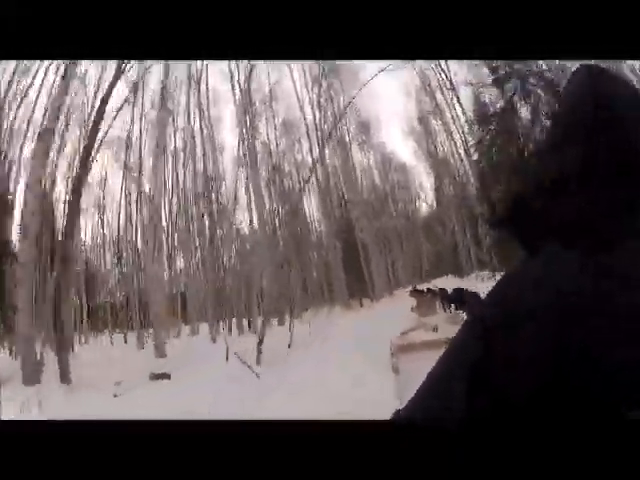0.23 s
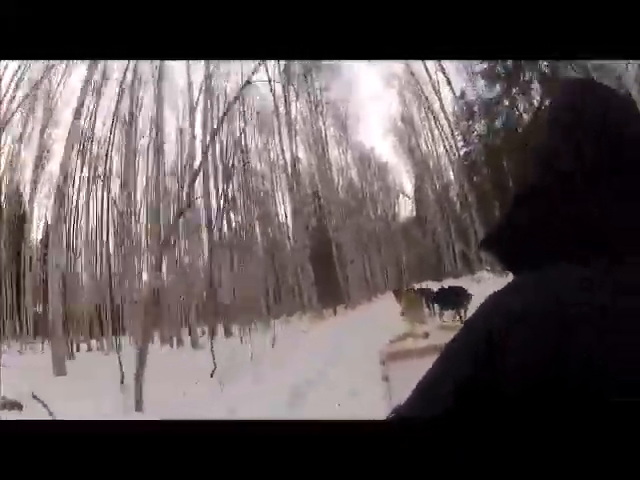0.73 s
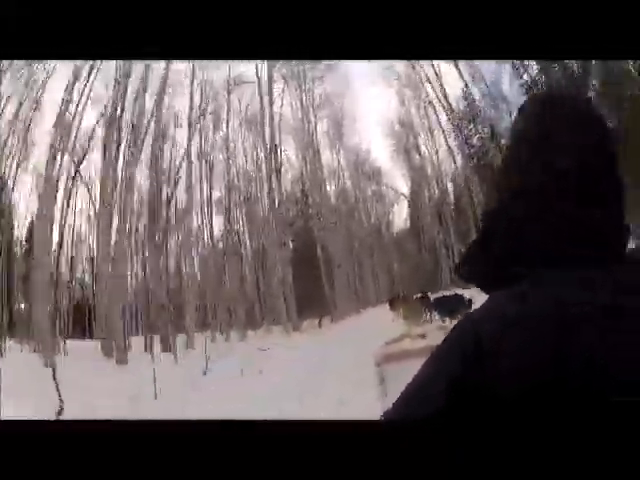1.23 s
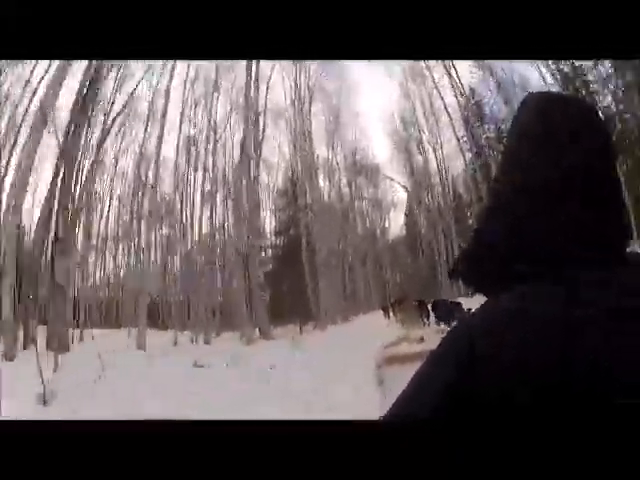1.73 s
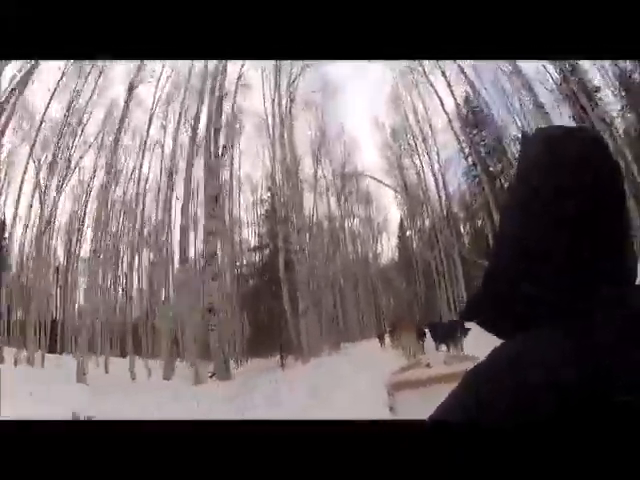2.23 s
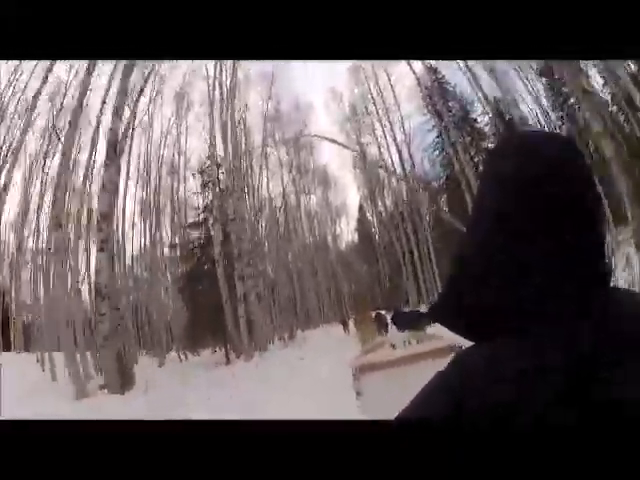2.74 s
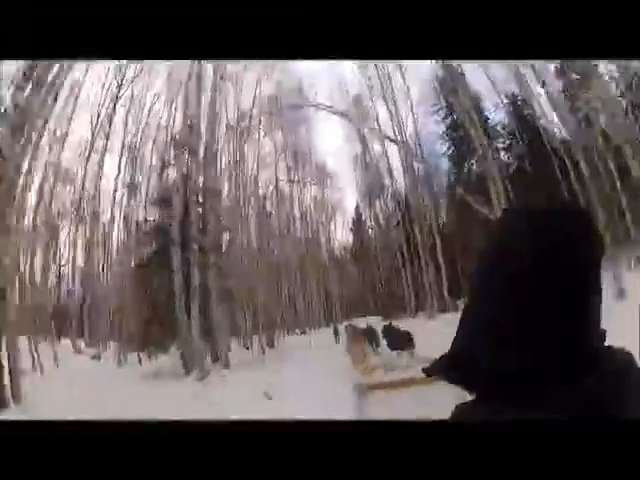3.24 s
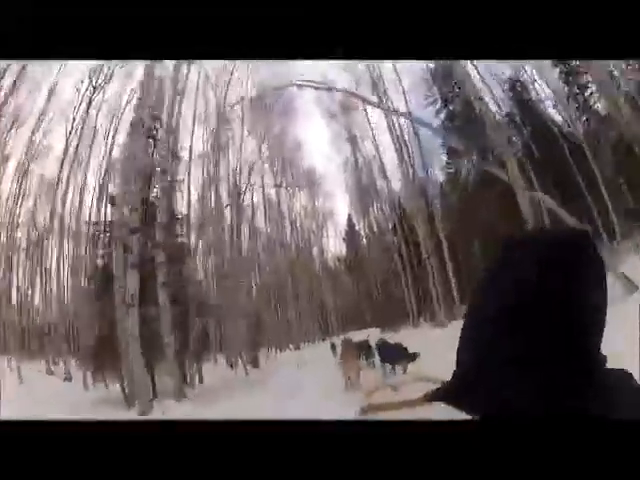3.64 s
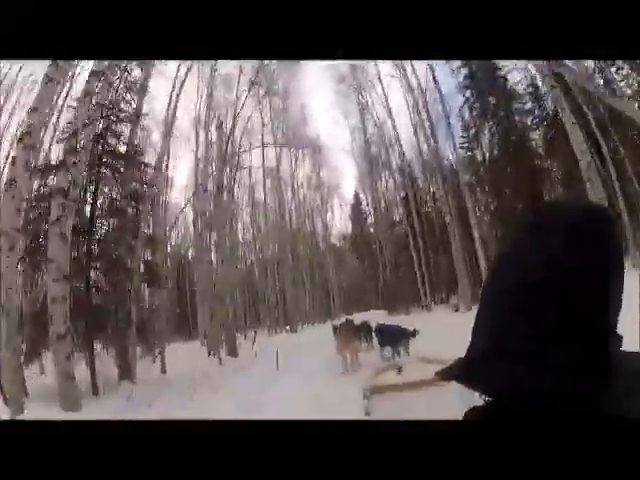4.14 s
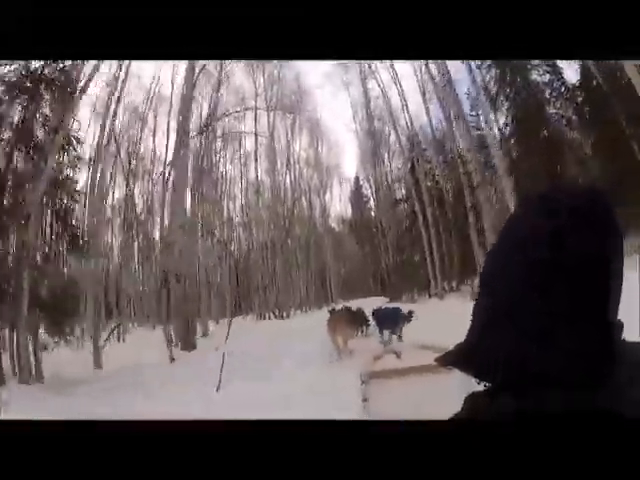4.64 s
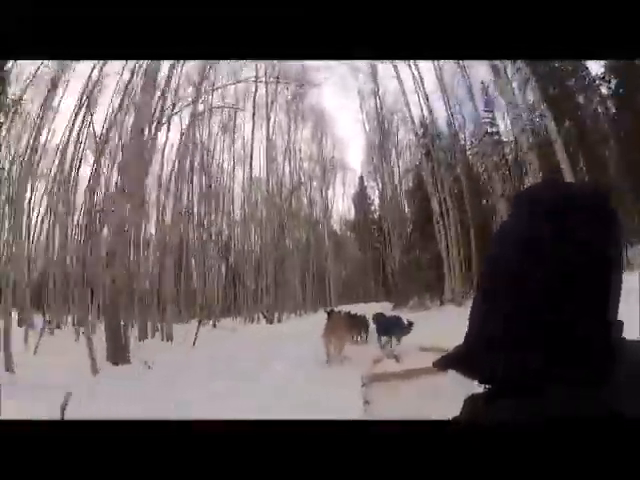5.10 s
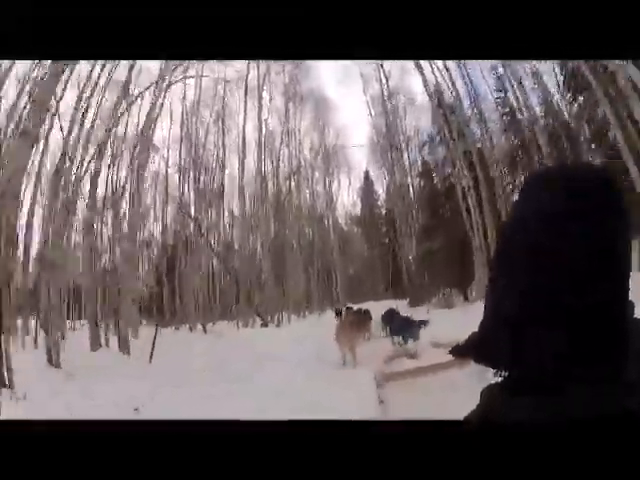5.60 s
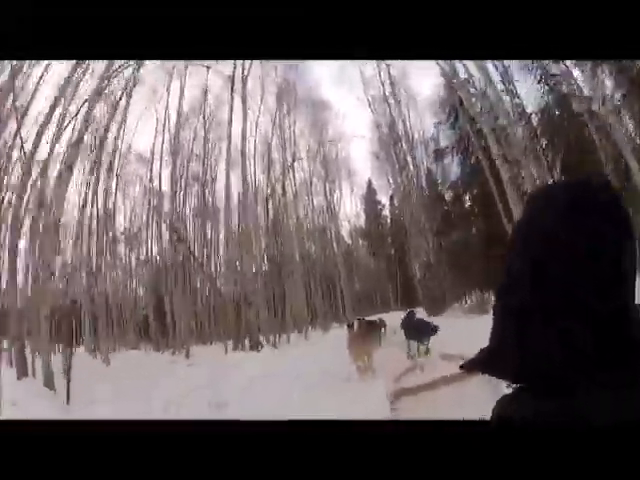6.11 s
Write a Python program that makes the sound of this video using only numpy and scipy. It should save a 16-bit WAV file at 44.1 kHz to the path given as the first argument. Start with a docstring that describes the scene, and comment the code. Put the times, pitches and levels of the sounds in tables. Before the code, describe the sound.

Muffled wooden sled runners chatter and rumble along a packed snow trail, with irregular knocks, faint snow hiss and a few hard, heavy slams.

```python
"""On a packed snow trail, a wooden sled slides along, heard through a sealed camera housing.
Runner chatter is random crust clicks ringing the frame modes; bumps add knocks, slams and thuds.
Noise bursts tick on the shell, coloured noise makes a faint snow hiss and a deep rumble.
The recorder samples slowly and holds each value, which mirrors the bass into the treble."""
import sys
import numpy as np
from scipy import signal
from scipy.fft import rfft, irfft, next_fast_len
from scipy.io import wavfile

SR = 44100
rng = np.random.default_rng(int(sys.argv[2]) if len(sys.argv) > 2 else 0)


def makeup_ratio(level_db):
    """Linear amplitude ratio for a level in decibels (20 dB per factor of ten)."""
    decades = np.asarray(level_db, float) / 20
    return 10 ** decades


def wav_out(sig):
    """Save sig, one row per channel (or a flat mono array), as 16-bit PCM at SR to the path in sys.argv[1]."""
    wavfile.write(sys.argv[1], SR, np.round(np.clip(np.atleast_2d(sig).T, -1, 1) * 32767).astype(np.int16))


N = 280476  # length in samples


def rms_one(x):
    """Scales x to an rms of 1."""
    return x / np.sqrt(np.mean(x ** 2) + 1e-20)


def in_time(rows):
    """Draws straight lines between timed rows, one curve per column after the time."""
    s, *columns = np.transpose(rows)
    return [np.interp(np.arange(N) / SR, s, c) for c in columns]


def drift(rate_hz):
    """Slow random wander of spread 1: noise through two equal poles at rate_hz."""
    step = 40  # samples between computed points
    r = np.exp(-2 * np.pi * rate_hz * step / SR)
    noise = rng.standard_normal(N // step + 2002)
    slow = signal.lfilter([1], [1, -2 * r, r * r], noise)[2000:]  # drop the filter's start
    return np.interp(np.arange(N) / step, np.arange(len(slow)), rms_one(slow))


def resonate(x, hz, width_hz):
    """Two-pole resonance; a unit click rings with a height of about 1."""
    r, w = np.exp(-np.pi * width_hz / SR), 2 * np.pi * hz / SR
    return signal.lfilter([0, np.sin(w)], [1, -2 * r * np.cos(w), r * r], x + 1e-18)


def low_pass(x, cut_hz, order):
    """Butterworth roll-off above cut_hz."""
    return signal.sosfilt(signal.butter(order, cut_hz, fs=SR, output="sos"), x)


def grains(per_s, spread_db):
    """Random clicks of uneven size and sign; rms 1."""
    size_db = spread_db * np.minimum(rng.exponential(1, N), 4)
    clicks = makeup_ratio(size_db) * rng.choice([-1, 1], N)
    return rms_one(clicks * (rng.random(N) < per_s / SR))


def coloured(x, spectrum):
    """Shapes x to a spectrum of (frequency [Hz], level [dB per Hz]); rms 1."""
    size = next_fast_len(N)
    hz, db = np.transpose(spectrum)
    f = np.maximum(np.fft.rfftfreq(size, 1 / SR), 1)
    gain = makeup_ratio(np.interp(np.log(f), np.log(hz), db, -90, -90))
    return rms_one(irfft(rfft(x, size) * gain, size)[:N])


def crust_bumps():
    """Dense small clicks of the crust under the runners, swelling and fading at random."""
    return grains(300, spread_db=0.5) * makeup_ratio(3.0 * drift(10.2))


# Resonant modes of the sled frame: (frequency [Hz], width [Hz], level [dB])
FRAME_MODES = [(55, 40, -8), (100, 60, -7), (134, 32, 0), (195, 50, -4), (240, 40, -3), (290, 28, 0),
               (350, 50, -8), (440, 70, -4), (520, 60, -2), (595, 50, 0)]
# Borders between the deep, middle and upper modes: (frequency [Hz])
MODE_BORDERS_HZ = [170, 380]


def frame_shake(levels_db, crust):
    """Crust bumps excite every frame mode; each mode also gets bumps of its own."""
    groups = np.zeros((3, N))  # deep, middle, upper
    lumps = grains(45, spread_db=2.0)  # sparse lumps of ice
    for k, (hz, width_hz, db) in enumerate(FRAME_MODES):
        own_bumps = grains(500, spread_db=2.0) * makeup_ratio(0.65 * drift(15.0))
        push = 0.5 * crust + 0.33 * lumps + own_bumps
        group = int(hz > MODE_BORDERS_HZ[0]) + int(hz > MODE_BORDERS_HZ[1])
        sign = (-1) ** k  # neighbouring modes move in opposite phase
        groups[group] += sign * makeup_ratio(db) * rms_one(resonate(push, hz, width_hz))
    return sum(makeup_ratio(db) * rms_one(x) for db, x in zip(levels_db, groups))


# Bumps that knock the frame: (time [s], strike level [dB], best-struck pitch [octaves above the
# lowest mode], spread around that pitch [octaves], slam level [dB])
BUMPS = [(0.393, -26, 2.4, 0.33, -24), (0.522, -43, 2.2, .7, -19.5), (0.862, -25, 2.1, 0.26, -22),
         (0.977, -11, 2.44, 0.52, -38), (0.992, -20.5, 2.2, 1.8, -40), (1.099, -20, 2.65, 0.77, -28),
         (1.15, -23.5, 1.6, 1.3, -47), (1.218, -27.5, 2.05, 1.34, -39), (1.473, -20.5, 2, 0.47, -43),
         (1.614, -27.5, 2.78, 0.49, -16.5), (1.846, -22.5, 1.64, 0.67, -29), (2.042, -31, 2.77, 0.88, -27),
         (2.278, -26.5, 2.83, 0.4, -30), (2.375, -19, 1.73, 0.39, -42), (2.39, -22, 2.14, 0.25, -35),
         (2.486, -26.5, 2.75, 0.7, -31), (2.53, -25.5, 2.85, 0.46, -29), (2.615, -34.5, 3.8, 0.65, -42),
         (2.729, -23.5, 2.5, 0.56, -24), (2.752, -20, 4, .8, -32), (2.764, -21.5, 1.95, 1.57, -36),
         (2.78, -21.5, 1.5, 0.38, -42), (2.79, -18, 2.77, 0.53, -38), (2.801, -24.5, 2.2, 0.77, -39),
         (3.380, -19, 1.49, 0.95, -9), (3.3958, -34, 1.14, 1.3, -15.5), (3.442, -26, 1.76, 0.49, -22),
         (3.849, -23, 2.64, 0.46, -18), (3.887, -18.5, 2.6, 0.58, -35), (3.902, -28, 2.1, 0.58, -26),
         (4.398, -29, 2.76, 0.68, -48), (4.707, -24.5, 2.24, 0.75, -25), (4.805, -35, 3.14, .6, -34),
         (5.205, -30.5, 2.1, .6, -25), (5.298, -32, 2.9, 0.62, -26), (5.682, -20.5, 1.2, 1.57, -30),
         (5.699, -28, .6, 1.9, -29), (6.097, -28, 2.6, 1.2, -34), (6.129, -26, 2.17, 0.83, -17),
         (6.1375, -23.5, 1.68, 1.06, -1.5), (6.156, -15.5, 1.28, 1.1, -19.5), (6.173, -35, 1.64, 0.83, -26),
         (6.208, -24, 1.65, 0.76, -38), (6.328, -25, 1.93, 0.77, -29)]
THUD_HZ, THUD_DB, THUD_DB_PER_OCTAVE = 42.4, -4.5, -5.5  # re slam; weaker under a higher pitch
SLAM_CYCLES = 0.78  # a slam's envelope peaks after this many cycles


def knocks():
    """Padded blows ring the modes near their pitch, the joints build it up; slams and thuds join in."""
    s, strike_db, octave, spread, slam_db = np.transpose(BUMPS)
    at, out = np.round(s * SR).astype(int), np.zeros(N + SR)
    lowest_hz = FRAME_MODES[0][0]
    for hz, width_hz, db in FRAME_MODES:
        distance = (np.log2(hz / lowest_hz) - octave) / spread
        blows = np.zeros(N)
        blows[at] = makeup_ratio(strike_db + db - 7.4 * distance ** 2)
        struck = resonate(blows, hz, 1.09 * width_hz)
        share = 0.39  # width of the joints' broad resonance, as a share of its pitch
        motion = np.diff(struck, prepend=0)  # the joints pass motion, not steady load
        out[:N] -= 2 * share * resonate(motion, hz, share * hz)

    # the whole sled thuds under a slam
    thuds = np.zeros(N)
    thuds[at] = makeup_ratio(slam_db + THUD_DB + THUD_DB_PER_OCTAVE * octave)
    out[:N] += low_pass(resonate(thuds, THUD_HZ, 30.0), 90, order=2)

    # the dead slam: a sine that dies within a few cycles
    t = np.arange(SR // 10) / SR
    for i, o, db in zip(at, octave, slam_db):
        cycles = t * lowest_hz * 2 ** o
        rise = cycles / SLAM_CYCLES
        envelope = (rise * np.exp(1 - rise)) ** 2
        out[i:i + len(t)] -= makeup_ratio(db) * np.sin(2 * np.pi * cycles) * envelope
    return out[:N]


# Brittle ticks and scuffs on the shell:
# (time [s], peak level of the ring [dB], pitch [Hz], width [Hz], burst length [s])
SHELL_TICKS = [(0.165, -35.5, 3220, 1100, 0.0046), (0.343, -43, 2300, 800, 0.04),
               (0.972, -33.5, 2610, 250, 0.018), (0.977, -40, 3590, 900, 0.0072),
               (1.100, -37, 2340, 790, 0.011), (1.101, -41, 1180, 298, 0.021), (1.61, -41, 2370, 600, 0.01),
               (2.052, -39.5, 2730, 80.4, 0.01), (2.055, -47, 1980, 120, 0.012),
               (3.028, -41, 1070, 300, 0.0094), (3.369, -39.5, 2460, 790, 0.027),
               (3.944, -49, 1270, 300, 0.05), (5.958, -32.5, 2880, 1200, 0.0069),
               (6.126, -41, 2480, 600, 0.012)]
# the broader and shorter a tick, the more crack leaks through
CRACK_DB, CRACK_DB_PER_KHZ, CRACK_DB_PER_MS = -32, 27.5, -0.54


def ticks():
    """A short swell of noise rings the shell and leaks through as a thin bright crack."""
    out = np.zeros(N)
    noises = rng.standard_normal((len(SHELL_TICKS), SR // 10))
    t = np.arange(SR // 10) / SR
    for noise, (s, db, hz, width_hz, length) in zip(noises, SHELL_TICKS):
        swell = np.sin(np.pi * np.minimum(t / length, 1) ** 0.62)  # rises faster than it falls
        burst = np.diff(noise * swell, prepend=0)
        ring = resonate(resonate(burst, hz, width_hz), hz, 2 * width_hz)
        crack_db = CRACK_DB + CRACK_DB_PER_KHZ * width_hz / 1000 + CRACK_DB_PER_MS * length * 1000
        i = round(s * SR)
        out[i:i + len(t)] += makeup_ratio(db) * ring / np.abs(ring).max() + makeup_ratio(db + crack_db) * burst
    return out


# Colour of the crushed snow before its flicker and low-pass: (frequency [Hz], level [dB per Hz])
HISS_COLOUR = [(440, -70), (750, -3.5), (839, -3), (1560, -18), (1820, -14), (2710, -7), (3400, -16.5),
               (3770, -13.5), (4250, -25), (5270, -22), (5900, -22.5), (7670, -84), (13000, -120)]


def snow_hiss(crust):
    """Fine crystals crushed under the runners; each half octave flickers partly on its own."""
    crystals = coloured(rng.standard_normal(N) + 0.41 * crust, HISS_COLOUR)
    edges_hz = 400 * 2 ** np.arange(0, 4.1, .5)
    together = drift(15)
    above, out = crystals, 0
    for edge_hz in edges_hz[1:]:
        # peel off the lowest band of what remains
        band = signal.sosfiltfilt(signal.butter(3, edge_hz, fs=SR, output="sos"), above)
        above = above - band
        out = out + band * makeup_ratio(1.4 * together + 0.15 * drift(11))
    return low_pass(rms_one(out), 5800, order=8)


# Colour of the deep rumble: (frequency [Hz], level [dB per Hz])
RUMBLE_COLOUR = [(11, -30), (20, -25), (45, -2.5), (110, -1), (140, -23), (240, -120)]


def deep_rumble(level_db):
    """Low coloured noise whose level wavers at random."""
    return makeup_ratio(level_db + 1.0 * drift(8.2)) * coloured(rng.standard_normal(N), RUMBLE_COLOUR)


# Roughness of the trail between lurches:
# (time [s], frame shake level [dB], rumble level [dB], snow hiss level [dB])
TRAIL_ROUGHNESS = [(0.0, -38, -40.5, -54), (0.6, -39.5, -55, -54.5), (1.1, -33.5, -57, -52.5),
                   (1.4, -40, -52, -53), (1.75, -40.5, -45, -54.5), (2.2, -46, -44, -58),
                   (2.6, -43.5, -65, -54), (2.95, -38.5, -53, -53), (3.3, -41.5, -48, -57),
                   (3.48, -39.5, -55, -55), (3.56, -48.5, -45, -60), (3.72, -39.5, -50, -57.5),
                   (4.1, -39, -57, -53), (4.5, -38.5, -50, -55.5), (5.05, -45, -43, -57.5),
                   (5.5, -44, -45, -56), (5.9, -40.5, -37.5, -52), (6.36, -39, -42, -56)]


def trail():
    """The passing trail sets the base levels of shake, rumble and hiss."""
    return in_time(TRAIL_ROUGHNESS)


# The towline jerks and the sled lurches, pressing the runners down:
# (peak time [s], swell [dB], length [s], extra on the deep modes [dB])
TOWLINE_JERKS = [(0.123, 4, 0.06, 8), (0.423, 5.5, 0.35, 2), (0.82, 8, .1, -2.5), (1.008, 3, 0.048, -5),
                 (1.167, 7.5, .18, -11), (1.45, 5.5, 0.11, -3), (1.9, 12, 0.22, -4.5),
                 (2.376, 13.5, 0.36, -9), (2.644, 10, 0.094, 3.5), (2.76, 8, 0.093, -4), (3.344, 9, 0.3, 0),
                 (3.872, 7, 0.14, -5), (4.15, 5, 0.1, 0.5), (4.39, 5, 0.053, -4), (4.764, 6, 0.35, 2),
                 (5.232, 11.5, 0.14, 2), (5.69, 7.5, 0.17, 9.5), (6.09, 7.5, .08, -1),
                 (6.197, 7.5, 0.087, 1.5)]
RISE_SHARE = 0.31  # part of a lurch spent rising


def lurches():
    """Swell in dB of all lurches, and the extra on the deep modes; quick rise, slower fall."""
    t, swell_db, deep_db = np.arange(N) / SR, 0, 0
    for s, db, length, extra_db in TOWLINE_JERKS:
        side = length * np.where(t < s, RISE_SHARE, 1 - RISE_SHARE)
        shape = np.exp(-((t - s) / side) ** 2)
        swell_db = swell_db + db * shape
        deep_db = deep_db + extra_db * shape
    return swell_db, deep_db


def sealed_shell(frame):
    """The sealed shell shuts out the frame's treble."""
    return low_pass(frame, 842, order=4)


DEEP_DB, CHATTER_DB = -3, 0.5  # deep and upper modes against the middle ones
CHATTER_FOLLOWS, HISS_FOLLOWS, RUMBLE_FOLLOWS = 0.35, 0.2, 0.05  # share of a lurch's swell


def scene():
    """Trail and lurches drive the frame, hiss and rumble; the same mix goes to both channels."""
    shake_db, rumble_db, hiss_db = trail()
    swell_db, extra_deep_db = lurches()
    crust = crust_bumps()
    rumble = deep_rumble(rumble_db + RUMBLE_FOLLOWS * swell_db)

    shake_db = shake_db + 1.98 * drift(10.8)  # the whole frame flickers together
    deep_db = shake_db + DEEP_DB + swell_db + extra_deep_db + 2.9 * drift(15)
    middle_db = shake_db + swell_db + 1.9 * drift(12.5)
    upper_db = shake_db + CHATTER_DB + CHATTER_FOLLOWS * swell_db + 1.93 * drift(4)
    frame = sealed_shell(frame_shake([deep_db, middle_db, upper_db], crust) + knocks())

    hiss = makeup_ratio(hiss_db + HISS_FOLLOWS * swell_db) * snow_hiss(crust)
    return np.tile(frame + rumble + hiss + ticks(), (2, 1))


def slow_sampler(x):
    """Sampled at 12 kHz, clipped, each value held four steps: mirror images around that rate."""
    slow = signal.resample_poly(x, 40, 147)
    held = np.repeat(np.clip(slow, -.497, .497), 4)  # now at 48 kHz
    out = signal.resample_poly(held, 147, 160)[:N]
    return np.pad(out, (0, N - len(out)))


def top_cut(x):
    """Nothing passes above the cut-off."""
    return signal.sosfilt(signal.butter(12, 16610, fs=SR, output="sos"), x)


def record(dry):
    """Slow sampling of one channel, then a steep treble cut, spread to both channels."""
    held = slow_sampler(dry[0])
    treble_cut = signal.cheby2(16, 60, 15950, fs=SR, output="sos")  # 60 dB down from 15950 Hz
    mix = np.tile(signal.sosfilt(treble_cut, held), (2, 1))
    return top_cut(mix)


dry = scene()
out = record(dry)
wav_out(out)
```